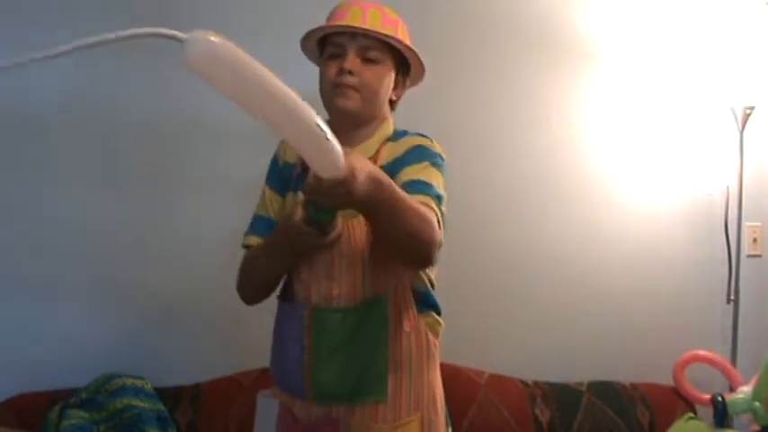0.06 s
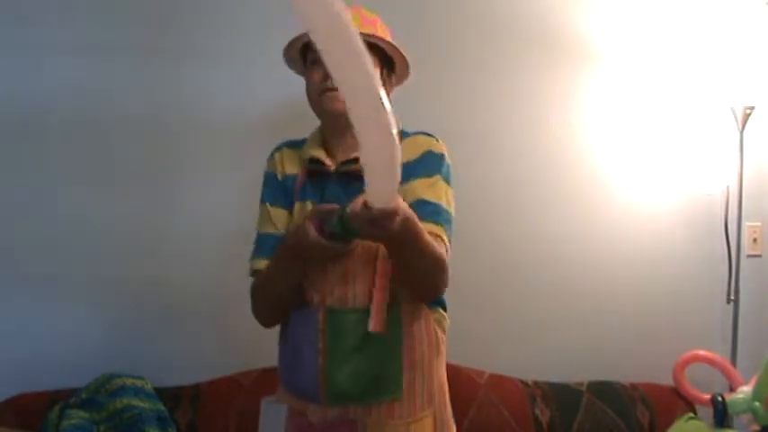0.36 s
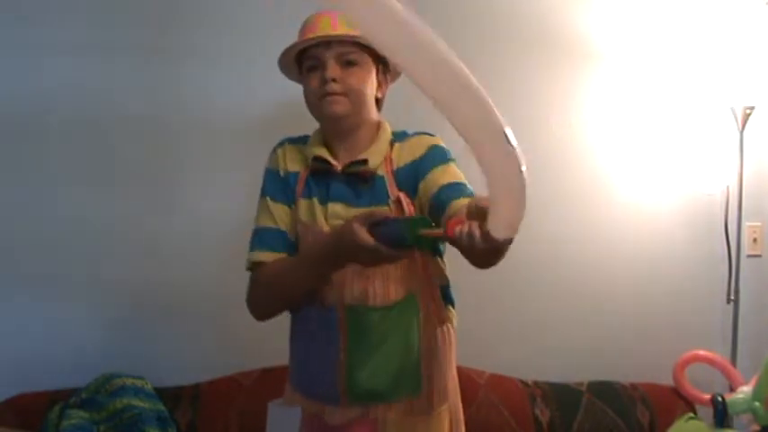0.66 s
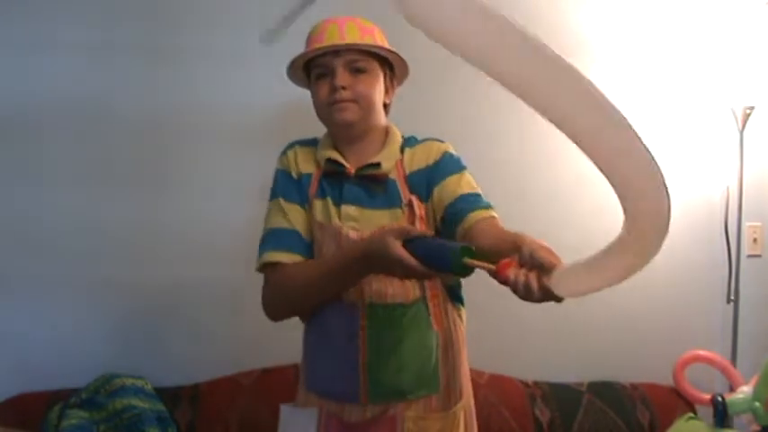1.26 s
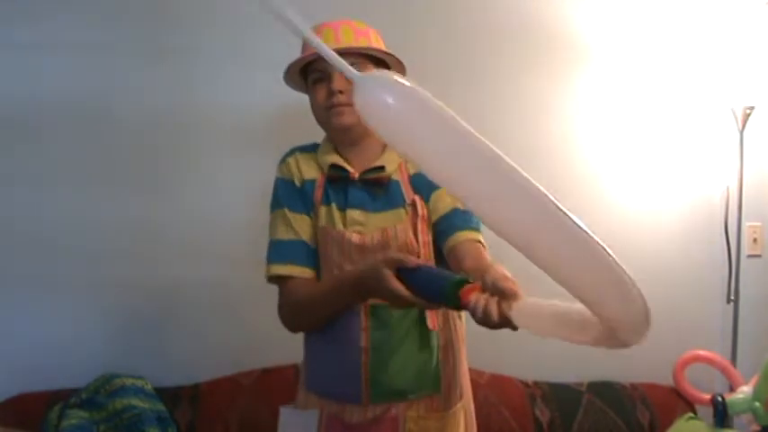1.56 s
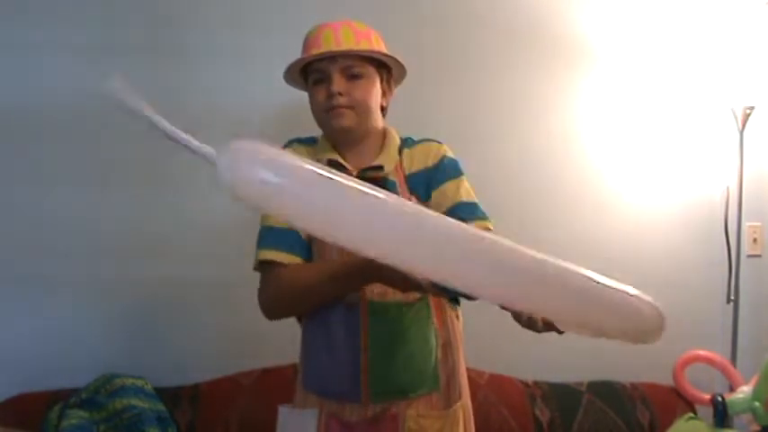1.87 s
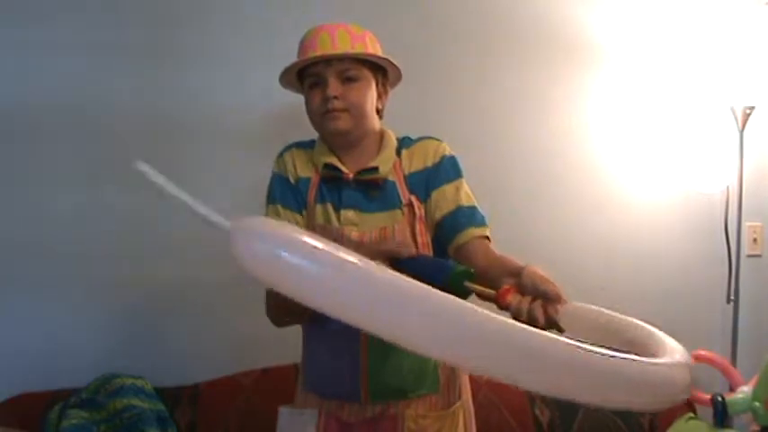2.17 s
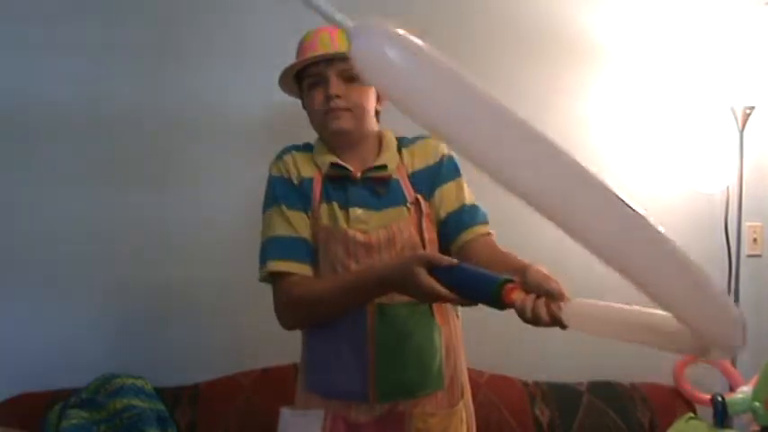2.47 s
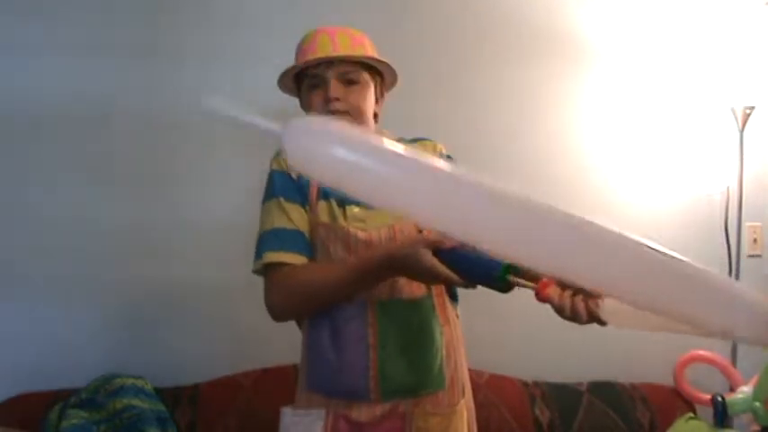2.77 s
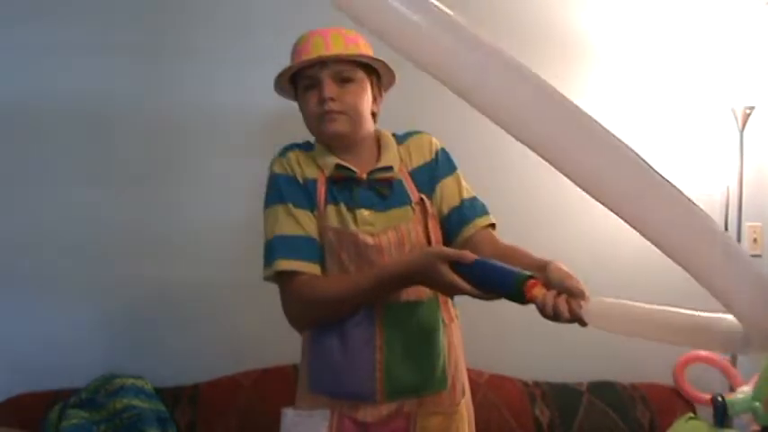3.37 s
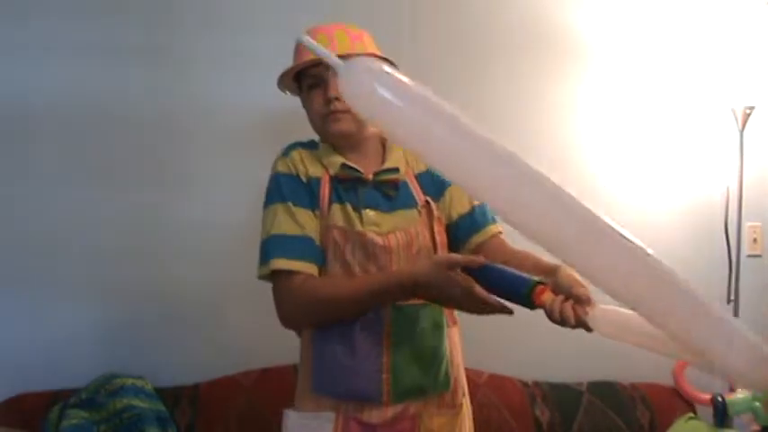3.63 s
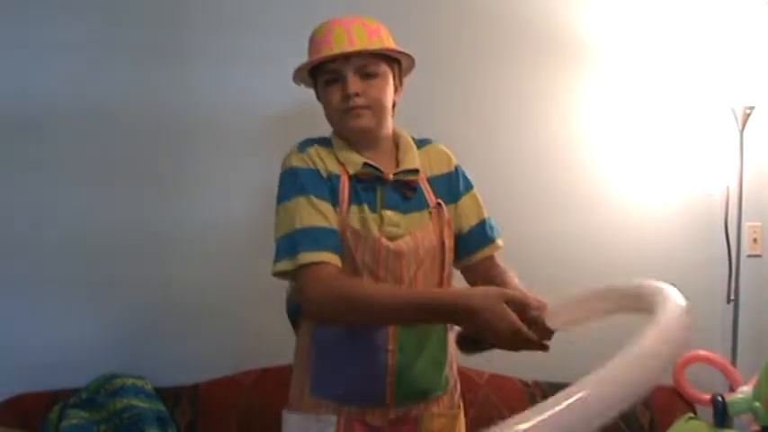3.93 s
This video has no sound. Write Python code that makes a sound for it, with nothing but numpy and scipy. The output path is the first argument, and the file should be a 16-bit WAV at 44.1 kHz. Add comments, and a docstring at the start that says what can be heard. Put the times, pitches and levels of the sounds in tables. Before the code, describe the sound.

A plastic hand pump fills a balloon with quick whooshes and clacks, squealing on the first three pulls. The strokes weaken and stop, then a hand faintly brushes the balloon over microphone hiss in a small room.

```python
"""Air whooshes through the valves of a two-way plastic hand pump, filling a long balloon in a small room.
Each stroke drives a turbulent jet; on the first three pulls the rubber valve oscillates and squeals.
The piston's seal grunts just before the stops. The piston clacks at one end of its travel and knocks
at the other, where a valve plops open. The strokes weaken and stop, and a hand brushes the balloon
over the microphone's hiss."""
import sys
import numpy as np
from scipy import signal
from scipy.fft import rfft, irfft, next_fast_len
from scipy.io import wavfile
from scipy.ndimage import map_coordinates

SR = 44100
rng = np.random.default_rng(int(sys.argv[2]) if len(sys.argv) > 2 else 0)


def log_audio(samples):
    """Write samples as a 16-bit WAV file to the path given in sys.argv[1]."""
    # one column per channel
    frames = np.atleast_2d(samples).T
    # limit to full scale, then quantise
    limited = np.clip(frames, -1, 1)
    pcm = np.round(limited * 32767).astype(np.int16)
    wavfile.write(sys.argv[1], SR, pcm)


N = 176400
CONTACT_S = .0014  # rise time constant of a struck mode


def amp(db):
    """Amplitude ratio of a level in decibels."""
    return 10 ** (np.asarray(db) / 20)

def unit(x):
    """Normalisation to rms 1."""
    return x / np.sqrt(np.mean(x ** 2) + 1e-20)

def along(points, hz):
    """Interpolation of (f/Hz, value) points on a logarithmic frequency axis."""
    f, v = np.transpose(points)
    return np.interp(np.log(hz + 1), np.log(f + 1), v)

def clock():
    """Time of each sample in seconds."""
    return np.arange(N) / SR

def wobble(rate):
    """Smooth random modulation with `rate` knots a second."""
    return map_coordinates(rng.standard_normal(N // 8), [clock() * rate], mode="wrap")

def filtered(x, response):
    """Linear filtering: the spectrum of x times a frequency response."""
    size = next_fast_len(N + SR // 2)
    return irfft(rfft(x, size) * response(np.fft.rfftfreq(size, 1 / SR)), size)[..., :N]

def noise(spectrum, peaks=()):
    """Spectral shaping: noise of rms 1 with a colour (f/Hz, level/dB) and narrow resonances."""
    def response(f):
        lift_db = sum(db / (1 + (2 * (f - hz) / width) ** 2) for hz, width, db in peaks)
        return amp(along(spectrum, f) + lift_db)
    return unit(filtered(rng.standard_normal(N), response))

def swell(s, rise, fall):
    """Half-sine velocity pulse that peaks at time s."""
    t = clock() - s
    return np.abs(np.cos(np.pi / 2 * np.clip(np.where(t < 0, -t / rise, t / fall), 0, 1)))

def decay(s, t60, rise):
    """Exponential decay after a quick rise at time s."""
    t = np.maximum(clock() - s, 0)
    return (1 - np.exp(-t / rise)) * np.exp(-np.minimum(np.log(1000) * t / t60, 20))

def ring(blows, modes):
    """Modal superposition: each blow (t/s, level/dB) excites damped, slightly scattered sinusoids."""
    out, t = np.zeros(N + SR), np.arange(SR // 2) / SR
    for s, db in blows:
        tone = 0
        for hz, level, t60 in modes:
            envelope = amp(level + rng.normal(0, 1.3)) * np.exp(-np.log(1000) * t / t60)
            cycles = hz * t * (1 + rng.normal(0, .0072)) + rng.random()
            tone += envelope * np.sin(2 * np.pi * cycles)
        out[round(s * SR):][:len(t)] += amp(db) * tone * (1 - np.exp(-t / CONTACT_S))
    return out[:N]


# Piston strokes: t/s of fastest flow, rise/s, fall/s, level/dB
STROKES = [(.01, 0.13, 0.15, -21.5), (0.328, 0.17, 0.14, -23), (0.608, 0.13, 0.14, -22),
           (.91, 0.16, .14, -29), (1.221, 0.15, 0.14, -25.5), (1.53, 0.14, 0.15, -30),
           (1.87, 0.13, .16, -29.5), (2.26, 0.18, 0.26, -38.5), (2.7, 0.13, 0.15, -39.5)]
# Spectra of the bright jet and the lower rush: f/Hz, level/dB
JET_SPECTRUM = [(1000, -18.5), (2000, -7), (2900, -4.5), (4200, -7), (5400, -4.5), (6500, -2), (7500, 1),
                (8300, -1.5), (9300, -1), (10200, -1.5), (11500, -5), (13000, -11.5), (15500, -18.5)]
RUSH_SPECTRUM = [(60, -76), (200, -2), (400, 1.5), (700, 2.5), (1000, 2.5), (1800, 3), (3000, -1.5),
                 (6000, -13.5)]
# Narrow fixed resonances that colour the rushing air: f/Hz, width/Hz, lift/dB
WHOOSH_PEAKS = [(1194, 26, 11), (2850, 130, 3.5), (4770, 88, 8), (6070, 110, 7), (6650, 340, 4),
                (8070, 160, 5.5), (8480, 205, 8), (9900, 180, 4.5)]

def airflow():
    """Turbulent valve noise follows a power law of piston speed, steeper for the jet than the rush."""
    speeds = [(db, swell(s, rise, fall)) for s, rise, fall, db in STROKES]
    jet_level = sum(amp(db) * speed ** 2.47 for db, speed in speeds)
    rush_level = sum(amp(.59 * db) * speed ** .77 for db, speed in speeds)
    jet = jet_level * noise(JET_SPECTRUM, WHOOSH_PEAKS) * amp(wobble(rate=70))
    return jet + amp(-24.5) * rush_level * noise(RUSH_SPECTRUM, WHOOSH_PEAKS)


# Envelope of the hiss: t/s, level/dB
HISS_LEVEL = [(0, -48), (2.88, -49.5), (3.1, -45.5), (3.35, -46), (3.55, -45), (3.75, -42), (4, -44.5)]
# Spectra of the microphone hiss and the room noise: f/Hz, level/dB
HISS_SPECTRUM = [(300, -13), (700, -11), (1100, -14), (2400, -10.5), (3100, -7.5), (3600, -1.5),
                 (4050, -1.5), (4550, -9.5), (5800, -10), (7600, -6.5), (10500, -12), (13000, -12),
                 (15500, -21)]
ROOM_NOISE_SPECTRUM = [(25, -5.5), (70, -13), (115, -8.5), (170, -16), (500, -12.5), (900, -22),
                       (2000, -27)]

def noise_floor():
    """Microphone self-noise, partly coherent between channels, swells late on over low room noise."""
    level = amp(np.interp(clock(), *np.transpose(HISS_LEVEL)))
    top_hiss = amp(-55) * swell(3.78, rise=.33, fall=.33)
    top_hiss *= noise([(10000, -22), (12300, -2), (13400, 2), (14400, -2), (15800, -14)])
    mid = level * noise(HISS_SPECTRUM) + top_hiss + amp(-55.5) * noise(ROOM_NOISE_SPECTRUM)
    side = .37 * level * noise(HISS_SPECTRUM)
    return np.array([mid + side, mid - side])


def electrical_pips(per_second=30, hz=1520, first_s=.0532, half_width_s=.0025):
    """A periodic pulse train in the microphone: faint Gaussian tone bursts, strong and weak in turn."""
    beat = (clock() - first_s) * per_second
    number = np.round(beat)
    t = (beat - number) / per_second
    db = -49 - 5 * (number % 2) + wobble(per_second)
    return amp(db) * np.exp(-(t / half_width_s) ** 2) * np.sin(2 * np.pi * hz * t)


# Grunts of the piston seal: t/s, f/Hz, level/dB
GRUNTS = [(0.105, 234, -27), (.435, 120, -31), (.712, 260, -40), (1.015, 115, -37), (1.325, 270, -37),
          (1.65, 120, -40), (2.011, 280, -33.5), (2.43, 130, -38), (2.862, 300, -38)]

def seal_grunts():
    """Friction-induced vibration: the rubbing seal gives a brief low tone just before a stop."""
    waver = 1 + .06 * wobble(rate=80)
    return sum(amp(db) * decay(s, t60=.07, rise=.004) * np.sin(2 * np.pi * np.cumsum(hz * waver) / SR)
               for s, hz, db in GRUNTS)


# Impacts on the inner stop: t/s, rattle level/dB, rise/s, shell level/dB, thump f/Hz, thump level/dB,
# ring f/Hz, ring level/dB, rattle treble/dB
CLACKS = [(0.139, -26, 0.0038, -38.5, 229, -21, 2470, -23, -0.5),
          (.729, -27, 0.0029, -44.5, 340, -33, 2500, -19.5, 0),
          (1.344, -26.5, 0.0049, -39.5, 313, -24, 3070, -19.5, 0),
          (2.047, -26, 0.0057, -39, 313, -21.5, 2410, -15, -3),
          (2.9, -27.5, 0.0055, -32, 215, -21.5, 3000, -16.5, -2)]
# Spectrum of the rattle: f/Hz, level/dB
RATTLE_SPECTRUM = [(150, -7), (500, 2), (800, -7.5), (1100, 0), (1400, -7.5), (1850, -3), (3000, -6.5),
                   (4000, -5.5), (5500, -4.5), (8000, -3.5), (11000, -5.5), (15500, -21)]
# Modes of the pump body: f/Hz, level/dB, T60/s
SHELL_MODES = [(76, -9.5, 0.079), (119, -3, 0.09), (208, 1, 0.06), (301, 1.5, 0.06), (528, 9, 0.063),
               (629, 7.5, 0.041), (766, 8, 0.064), (1124, -2, 0.074)]

def piston_clacks(ring_width_hz=1100):
    """Impact excitation: the plastic rattles, rings and thumps; the grip shifts the pitch each blow."""
    out = np.zeros(N)
    for s, db, rise, shell_db, thump_hz, thump_db, ring_hz, ring_db, treble_db in CLACKS:
        grain = filtered(noise(RATTLE_SPECTRUM), lambda f: amp(along([(2000, 0), (5000, treble_db)], f)))
        chatter = unit(amp(2.5 * wobble(rate=400)))
        out += 2 * amp(db) * decay(s, t60=.14, rise=rise) * grain * chatter
        band = filtered(rng.standard_normal(N),
                        lambda f: 1 / (1 + (2 * (f - ring_hz) / ring_width_hz) ** 2))
        out += amp(ring_db) * decay(s, t60=.049, rise=rise) * unit(band)
        out += ring([(s, shell_db)], SHELL_MODES) + ring([(s, thump_db)], [(thump_hz, 0, .042)])
    return out


def rubber_flap(hz, octave_db, rough):
    """Nonlinear oscillation: three harmonics, to which roughness adds jitter, flutter and half orders."""
    pitch = hz * (1 + .003 * wobble(rate=90) + .0349 * rough * wobble(rate=700))
    phase = 2 * np.pi * np.cumsum(pitch) / SR
    harmonics = np.sin(phase) + amp(octave_db) * (np.sin(2 * phase) + amp(-16) * np.sin(3 * phase))
    half_orders = amp(-16.5) * rough * (.83 * np.sin(phase / 2) + np.sin(1.5 * phase))
    rasp = 1 + .17 * np.sqrt(np.abs(rough)) * wobble(rate=1300)
    flutter = amp(1.3 * wobble(rate=90) + 1.5 * rough * wobble(rate=250))
    return np.sqrt(2) * (harmonics + half_orders) * rasp * flutter


# Squeal contours, one per pull: t/s, f/Hz, level/dB, octave/dB re fundamental, roughness (0-1)
SQUEALS = [
    [(.212, 2766, -27.5, -6, 0.16), (.235, 2712, -25, 0.5, 0.3), (.3, 2670, -28, 4.5, 0.16),
     (.33, 2780, -28.5, 5.5, .7), (.365, 2810, -23, -2, .9), (.4, 2671, -24.5, -3, 0.68),
     (.435, 2744, -30, -3, 0.5), (.465, 2700, -60, -12, 0.6)],
    [(.812, 2890, -31, -4, 0.26), (.822, 2831, -24, -3, 0.16), (.855, 2770, -20, -13, 0.1),
     (.885, 2693, -22, -5, 0), (.945, 2691, -25.5, -11, 0.08), (.982, 2566, -30.5, -5, 0.5),
     (1.025, 2530, -51, -7, 0.6)],
    [(1.478, 2686, -44, -18, 0.16), (1.51, 2658, -30.5, -24, 0.31), (1.53, 2670, -28.5, 1.5, 0.09),
     (1.56, 2606, -31, -14, 0), (1.59, 2540, -30.5, -10, 0.55), (1.64, 2460, -45, -26, 0.7)],
]
# Side tones (whistles and half orders of the squeal): start t/s, end t/s, start f/Hz, end f/Hz,
# start level/dB, end level/dB, octave/dB re fundamental, roughness (0-1)
SIDE_TONES = [(0.224, 0.37, 3075, 2960, -24, -26, -1.5, 0.23),
              (0.218, 0.399, 3430, 3280, -30, -29.5, 1.5, 0.34),
              (0.235, 0.395, 4060, 4200, -32, -36, -17, 0.52), (0.219, 0.39, 1376, 1400, -37.5, -42, -5, 1),
              (0.817, 0.946, 3410, 3385, -27, -48, -0.5, 0.15),
              (0.97, 1.005, 2530, 2470, -24.5, -39, -8, 0.3)]

def valve_squeals(edge_s=.0064, side_onset_s=.0094, side_fade_s=.022):
    """Self-sustained oscillation: the valve sings and sags in pitch; hard pulls add side tones."""
    t, out = clock(), np.zeros(N)
    for contour in SQUEALS:
        times, *columns = np.transpose(contour)
        hz, db, octave_db, rough = [np.interp(t, times, column) for column in columns]
        gate = np.clip(np.minimum(t - times[0], times[-1] - t) / edge_s, 0, 1)
        out += amp(db) * gate * rubber_flap(hz, octave_db, rough)
    for start, end, first_hz, last_hz, first_db, last_db, octave_db, rough in SIDE_TONES:
        gate = np.clip(np.minimum((t - start) / side_onset_s, (end - t) / side_fade_s), 0, 1)
        db = np.interp(t, [start, end], [first_db, last_db])
        hz = np.interp(t, [start, end], [first_hz, last_hz])
        out += amp(db) * gate * rubber_flap(hz, octave_db, rough)
    return out


# Impacts on the outer stop: t/s, puff level/dB, thud level/dB
KNOCKS = [(0.438, -32, -60), (1.042, -33, -43.5), (1.674, -33, -40), (2.473, -34.5, -38), (3.267, -64, -53)]
# Modes of the thud: f/Hz, level/dB, T60/s
THUD_MODES = [(73.4, 0, 0.18), (116, 7, 0.073), (280, 1.5, 0.043), (1100, 3.5, 0.067), (1750, 1, 0.07)]

def piston_knocks():
    """Damped free vibration follows each softer impact, with a puff of air."""
    envelope = sum(amp(db) * decay(s, t60=.18, rise=.0022) for s, db, _ in KNOCKS)
    air = noise([(200, -.5), (2000, -.5), (3500, -4), (6000, -4), (9500, .5), (15500, -9.5)],
                WHOOSH_PEAKS)
    return 2 * envelope * air + ring([(s, db) for s, _, db in KNOCKS], THUD_MODES)


# Valve openings: t/s, knock level/dB, ring f/Hz, ring level/dB
PLOPS = [(.481, -33, 745, -26), (1.088, -33.5, 760, -23.5), (1.736, -32, 735, -26.5),
         (2.594, -35, 745, -25.5), (3.268, -58, 700, -48)]
# Modes of the valve: f/Hz, level/dB, T60/s
VALVE_MODES = [(298, 7, 0.044), (497, 10.5, 0.04), (596, 5.5, 0.058)]

def valve_plops():
    """Transient response of the opening valve: a dull knock and a hollow ring wavering with the flap."""
    out = ring([(s, db) for s, db, _, _ in PLOPS], VALVE_MODES)
    for s, _, hz, db in PLOPS:
        pitch = hz * (1 + .09 * wobble(rate=260))
        out += amp(db) * decay(s, t60=.15, rise=CONTACT_S) * np.sin(2 * np.pi * np.cumsum(pitch) / SR)
    return out


# Stray contacts of the piston: t/s, level/dB
TICKS = [(0.519, -21), (2.565, -33), (2.582, -24.5), (2.587, -29), (2.597, -27.5), (2.608, -30)]

def plastic_ticks():
    """Impulsive excitation: a very brief contact radiates a broad spectrum."""
    envelope = sum(amp(db) * decay(s, t60=.0066, rise=.000068) for s, db in TICKS)
    return 2 * envelope * noise([(400, 2), (1500, 8), (3000, 2), (5500, -5), (10000, -7.5), (15500, -21)])


# Hand movements on the balloon: t/s, half length/s, level/dB
BRUSHES = [(3.154, 0.22, -49.5), (3.451, 0.07, -40.5), (4.0, 0.11, -46.5)]

def balloon_brushes():
    """Friction noise of skin on rubber, its amplitude rising as the square of sliding speed."""
    envelope = sum(amp(db) * swell(s, half, half) ** 2 for s, half, db in BRUSHES)
    return envelope * noise([(70, 5.5), (200, -4), (900, 1), (2500, -5), (5000, -3.5), (8500, 2),
                             (11000, -5), (15500, -27)])


# Reverberation time: f/Hz, T60/s
ROOM_T60 = [(100, 0.3), (700, 0.3), (3000, 0.29), (9000, 0.21), (15000, 0.09)]
# Stereo width of the tail: f/Hz, side-to-mid amplitude ratio
TAIL_WIDTH = [(60, 0.11), (150, 0.2), (500, 0.57), (1500, 0.36), (6000, 0.24), (13000, 0.54)]

def room(x, wet_db):
    """Reverberation: direct sound plus a diffuse, decaying tail that differs a little between ears."""
    hz, t, diffuse = signal.stft(rng.standard_normal((2, SR // 2)), SR, nperseg=256)
    near_walls = 1 + amp(-15.5) * np.exp(-(t / .031) ** 2)  # stronger early reflections
    absorption = np.exp(-np.log(1000) * t / along(ROOM_T60, hz)[:, None])
    tail = signal.istft(diffuse * near_walls * absorption * (t > 0), SR, nperseg=256)[1]
    tail /= np.linalg.norm(tail[0])
    mid, side = amp(wet_db) * signal.fftconvolve(x[None], tail, axes=1)[:, :N]
    side = filtered(side, lambda f: along(TAIL_WIDTH, f))
    return (x + mid + np.array([side, -side])) / np.sqrt(1 + amp(wet_db) ** 2)


def scene():
    """Superposition of the pump and balloon, heard in the room, and the noise floor."""
    air = room(airflow() + balloon_brushes(), wet_db=-6.5)
    background = noise_floor() + electrical_pips()
    piston = room(seal_grunts() + piston_clacks() + piston_knocks() + plastic_ticks(), wet_db=-2)
    valves = room(valve_squeals(), wet_db=-3.5) + room(valve_plops(), wet_db=-1)
    return air + background + piston + valves


def record(dry):
    """Band limiting: a first-order high-pass and a sharp upper cutoff."""
    low_hz, top_hz = 40, 15850
    return filtered(dry, lambda hz: (hz < top_hz) * 1j * hz / (low_hz + 1j * hz))


dry = scene()
out = record(dry)
log_audio(out)
```